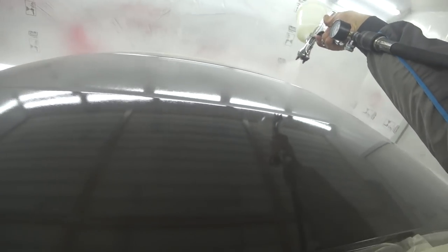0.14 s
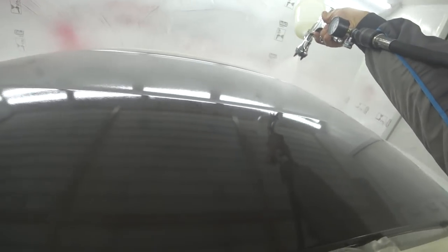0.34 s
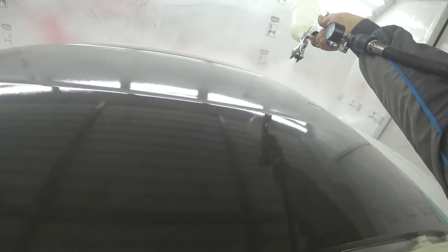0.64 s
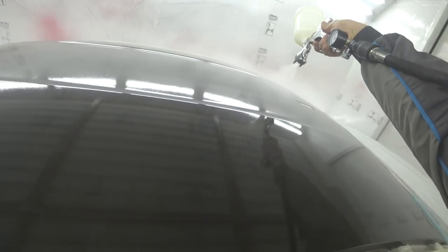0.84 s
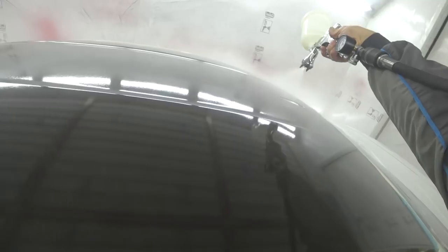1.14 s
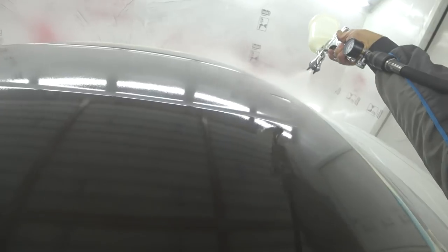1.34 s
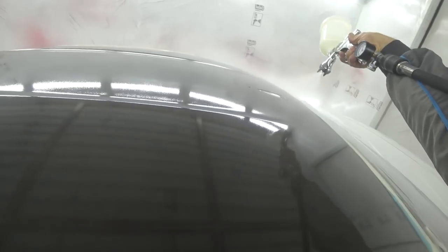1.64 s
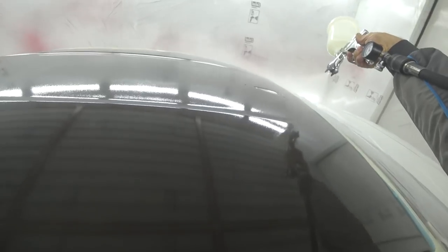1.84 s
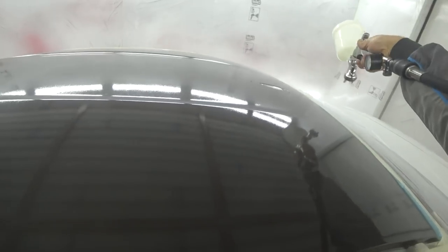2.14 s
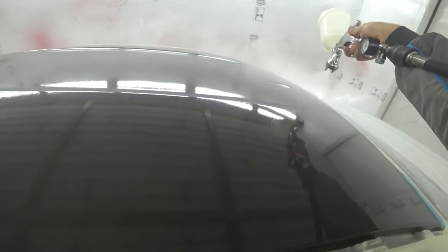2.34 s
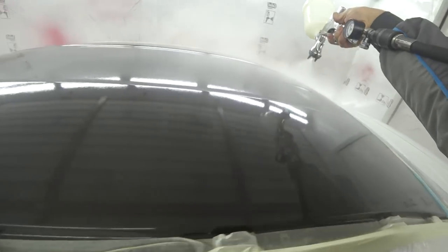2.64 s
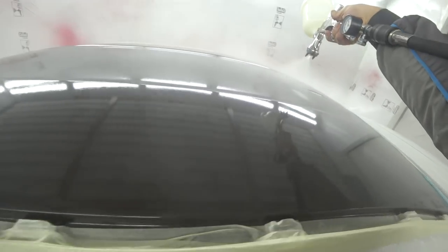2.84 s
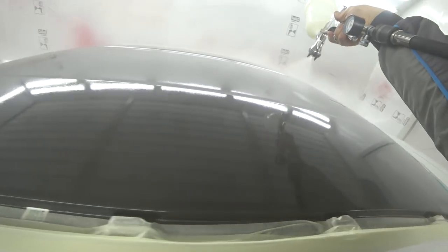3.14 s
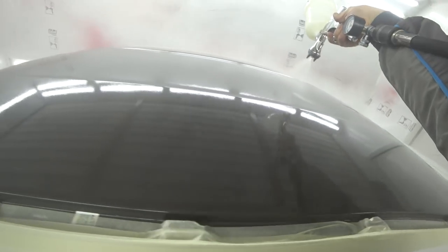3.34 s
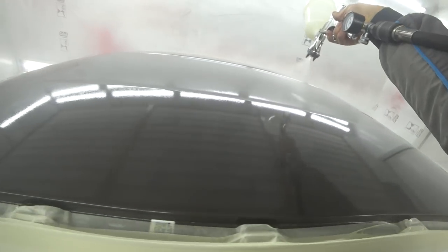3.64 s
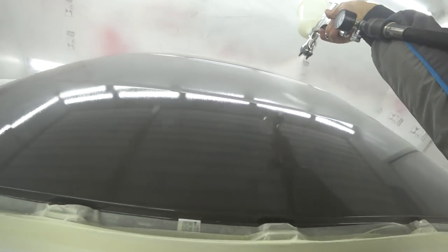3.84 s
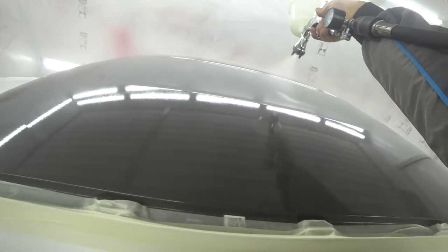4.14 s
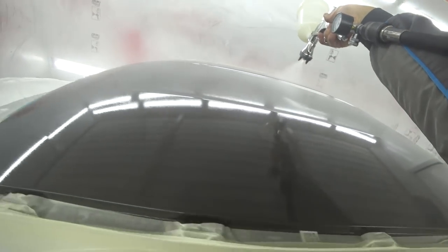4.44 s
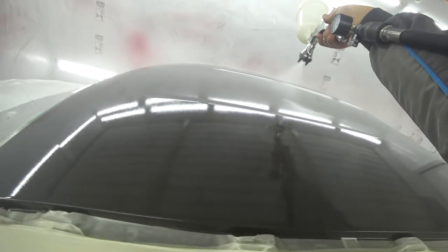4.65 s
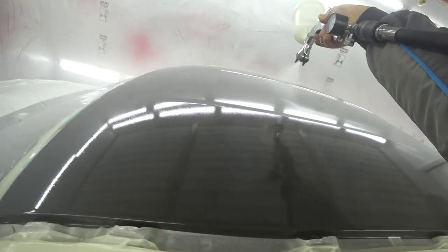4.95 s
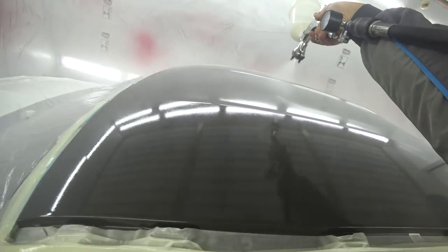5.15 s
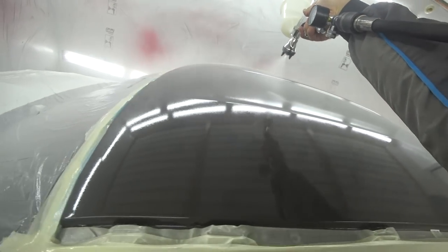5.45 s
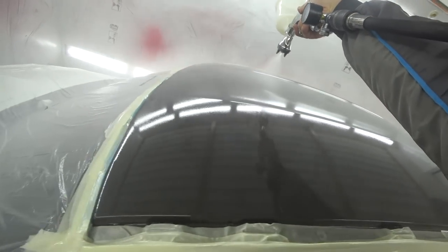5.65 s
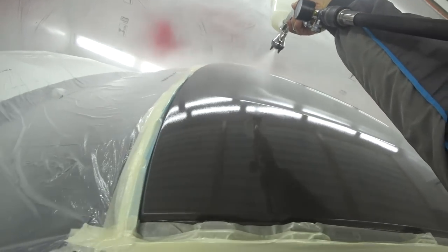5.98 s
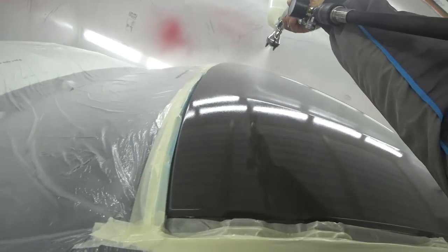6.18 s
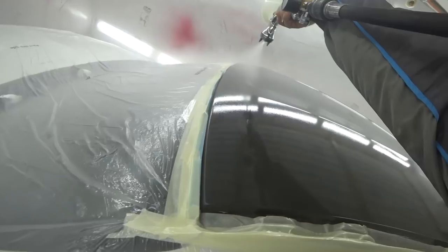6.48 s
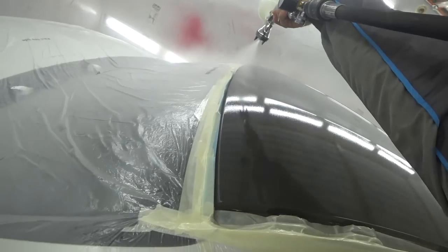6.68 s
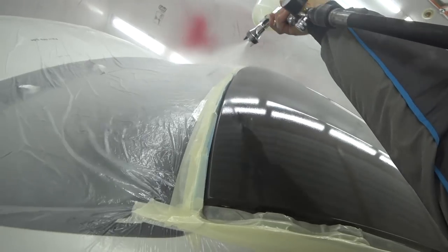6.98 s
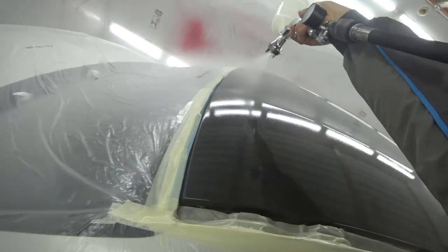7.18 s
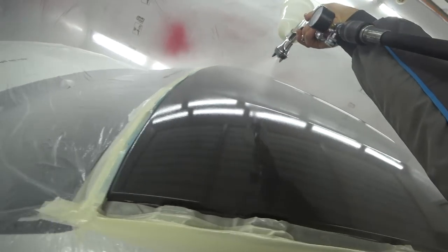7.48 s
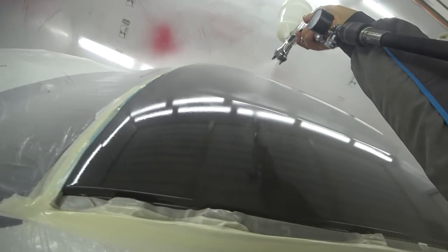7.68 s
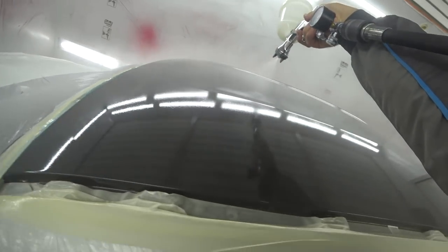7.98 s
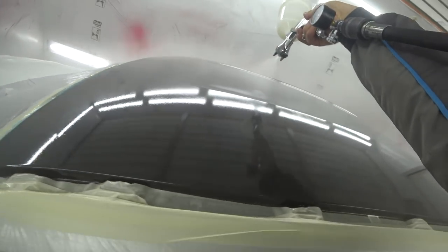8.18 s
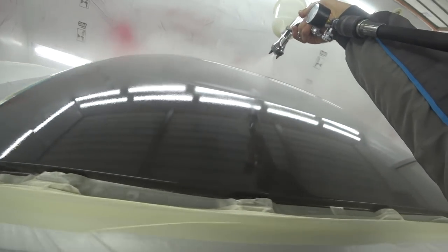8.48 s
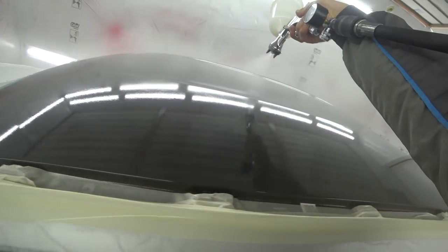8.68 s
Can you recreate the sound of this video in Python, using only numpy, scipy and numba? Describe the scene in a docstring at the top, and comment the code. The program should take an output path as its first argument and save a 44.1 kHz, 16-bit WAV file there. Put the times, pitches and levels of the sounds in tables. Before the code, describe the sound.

A spray gun is already hissing at 0 s and continues unbroken to the end, nearly 9 s, at almost constant level. The sound is bright, dense and airy, strongest in the high range with little body, finely fluttering like turbulent air. It is close to a small stereo microphone worn by the painter, with a diffuse hiss returning from the booth walls. Its colour stays fairly settled until about 1.5 s, then shifts smoothly between 2 and 3 s, again near 4 s and 4.5 to 5 s, as the gun sweeps across the panel. Around 6 to 7 s it grows very slightly stronger, with quick swishy changes near 7 s as the pass turns back; another gradual shift follows until about 8.2 s. Underneath throughout, two faint mid-low fan tones waver and swell unevenly over soft, gusty duct rush and deep rumble.

```python
"""A closed paint booth: a spray gun hisses at arm's length from a small camera on the painter's body.
The jet is coloured noise; it radiates unevenly and echoes off the panel, so its colour shifts with each pose.
The walls return a diffuse hiss. Two extractor fans sing sine blade tones over a noise rumble and rush in the
ducts. The camera's two ports give left and right their own level and phase."""
import sys
import numpy as np
from scipy import signal
from scipy.fft import rfft, irfft, next_fast_len
from scipy.io import wavfile
from scipy.ndimage import uniform_filter1d
from numba import njit

SR = 44100
rng = np.random.default_rng(int(sys.argv[2]) if len(sys.argv) > 2 else 0)


def store_wav(level_fs):
    """Save 16-bit WAV to argv[1]."""
    pcm = np.round(np.clip(np.atleast_2d(level_fs), -1, 1) * 32767)
    wavfile.write(sys.argv[1], SR, pcm.T.astype(np.int16))


N = 388962  # length in samples

# Colour of the jet in each pose of the painter. Each row: frequency in Hz, relative density in dB per Hz.
REACH_RIGHT = [(1300, -47), (2240, -15), (2930, -5), (3880, -8), (4390, -2), (5000, -8.5), (5340, -1.5),
               (5770, -4.5), (6980, -2.5), (7410, 0.5), (8100, 2), (12140, -9.5), (12920, -5.5),
               (15680, -9)]
TURN_RIGHT = [(1300, -52), (2240, -15), (3530, -1.5), (4050, -9.5), (4480, -6), (5860, -13), (6550, -1.5),
              (7150, -2.5), (9910, 2.5), (11280, -0.5), (12060, -7), (13350, -17), (14730, -20),
              (15680, -6)]
SET_OFF = [(1300, -45), (2240, -17.5), (2760, -9.5), (3790, -12), (4130, -6.0), (4650, -8.5), (7410, -0.5),
           (8610, -6.5), (9470, -1), (10850, -6), (12140, -16), (12830, -7.5), (13700, -5.5), (15680, -11)]
MID_PANEL = [(1300, -56), (2240, -15.5), (3360, -12.5), (5080, -4.5), (6200, -5.5), (6980, 1), (8530, -9.7),
             (9130, -4), (10680, -11), (12400, -6), (13440, -2), (14210, -7), (14900, -16), (15680, -11)]
LEAN_LEFT = [(1300, -40), (2240, -16), (3190, -11.5), (5000, -2.5), (7320, -0.5), (7750, -7), (8180, -3.5),
             (9730, -13.5), (10340, -4), (12230, -2), (12920, 1), (13780, -5.5), (14640, -15), (15680, -16)]
REACH_LEFT = [(1300, -41), (2240, -19.5), (2930, -19.5), (3960, -8), (5170, -7), (5600, -2.5), (6120, -6),
              (6630, -0.5), (9220, -15), (10340, -5.5), (12920, -8), (13950, -6.5), (14700, -13),
              (15680, -13)]
COME_BACK = [(1300, -52), (2240, -15.5), (3100, -14), (4220, -8), (4820, -15), (6200, -4), (7580, -1.5),
             (8010, 1), (8440, -1.5), (9470, -8), (10340, -13), (12230, -15), (13350, -8), (15680, -8.5)]
# How far off the camera's axis the gun is. One value for each pose: 0 ahead to 1 at the side.
OFF_AXIS = [0.93, .99, 1, 0.81, 0.35, 0.2, 0.36]
# The painter's sweep. Each row: time in seconds, pose 0-6 in the order above, level in dB.
SWEEP = [(0, .2, -43.5), (.6, .01, -43.5), (1.5, .1, -44.5), (1.95, .4, -45), (2.22, .93, -44),
         (2.45, 1.02, -44), (2.7, 1.42, -44), (3.1, 1.95, -44), (3.55, 2.02, -43.5), (3.97, 2.97, -43),
         (4.42, 3.05, -43), (4.85, 3.9, -43), (5.85, 4.05, -43), (6.2, 4.45, -42), (6.62, 4.62, -42.5),
         (6.86, 4.98, -42.5), (7.5, 5.03, -42), (8.18, 5.93, -42.5), (8.82, 6, -42.5)]
# Fringes of the echo off the panel, gliding as the gun moves.
# Each row: time in seconds, centre in Hz, peak or dip in dB.
HIGH_FRINGE = [(0, 14300, -5), (.4, 13700, -8), (.65, 13600, -2), (1.5, 14000, 4), (1.95, 13600, 4),
               (2.2, 14000, -1), (2.5, 13400, 5), (2.75, 13900, -8), (2.98, 14400, 0), (5, 12300, -3),
               (6.5, 12500, -2.5), (6.9, 13600, 2), (7.03, 13700, -7), (7.15, 13000, 1), (7.5, 13000, -2),
               (7.8, 13500, 2.5), (8.3, 14400, -3), (8.82, 14400, -2)]
MID_FRINGE = [(0, 10400, 3.5), (.4, 10300, 1.5), (1.9, 10300, -2.5), (2.15, 10400, -3), (2.3, 7300, -9),
              (2.7, 7000, -6), (2.9, 7160, -0.7), (5.6, 8600, -1.5), (6, 8700, -2), (6.85, 10200, -3),
              (6.97, 10000, 6), (7.04, 8000, -6), (7.15, 8300, 2), (7.32, 8100, -7), (7.4, 9800, 4),
              (7.55, 9700, -8), (8.2, 10300, 5), (8.82, 10300, 8.5)]
# Widths of the high and the mid fringe, in Hz.
FRINGE_WIDTH_HZ = 2300, 1000
# Low skirt of the jet. Each row: frequency in Hz, relative density in dB per Hz.
SKIRT = [(400, -47), (680, -16), (900, -5.5), (1350, 1), (1900, -4), (2200, -10.5), (2500, -20),
         (3000, -43)]
# Resonances and dips of the camera housing. Each row: centre in Hz, width in Hz, gain in dB.
HOUSING = [(2640, 380, 5), (3080, 520, -4), (3646, 150, -1.5), (4780, 200, 4), (5210, 440, -3.5),
           (5850, 500, 4), (6420, 640, -3), (9180, 380, -2.5), (10060, 450, 1), (11200, 450, 2),
           (11880, 710, -2.5)]
# The camera's two ports. Each row: frequency in Hz, left minus right in dB, lead of left in rad,
# further difference off axis in dB, further lead off axis in rad.
PORTS = [(30, 0, -0.049, 0, 0), (120, -2.5, -0.51, -4, 0), (403, -7.5, -0.53, -2, 0),
         (800, -9.5, -.2, 0, 0), (1050, -5.5, 0.3, 0, 0), (1840, -1, 0.071, -0.5, 0.096),
         (4060, .5, 0.25, 1, -0.1), (6400, 3, 0.29, -1, -0.68), (7400, 4.5, -0.029, -1, -0.97),
         (8200, 9, -0.13, -10, -0.86), (9000, -4, -.1, 6, -0.72), (10000, 2.5, -0.26, -3, -0.62),
         (11400, 2.5, -0.43, -0.5, -.7), (12300, -1.5, -0.11, -2, -0.9), (13900, 1, 0, -2.5, -0.92),
         (15500, 0, 0.21, -3, -.6)]
# Hiss returned by the booth walls. Each row: frequency in Hz, relative density in dB per Hz.
WALLS = [(1000, -40), (2500, -19), (4000, -15), (5500, -9), (7000, -2), (9000, 0), (12000, -2), (15500, -7)]
# Blade tones of the two fans and their sum tone; standing waves make them swell as the painter moves.
# Each row: time in seconds, first fan in dB, second fan in dB, sum tone in dB.
FANS = [(0, -73, -68, -86), (.25, -63, -60.5, -83), (.6, -68, -61, -84), (.85, -73, -60, -74.5),
        (1.45, -74, -62.5, -77.5), (1.8, -74, -65.5, -83), (2.0, -80, -69, -87), (2.2, -70, -65, -83),
        (2.45, -69, -64, -76.5), (3.1, -79, -61.5, -76.5), (3.45, -72, -64, -89), (4.2, -73, -67.5, -91),
        (4.8, -65.5, -60.5, -93), (5.3, -64.5, -65, -85), (5.55, -63.5, -61, -76.5),
        (6.0, -60.5, -65.5, -79), (6.2, -63.5, -74, -80), (7.4, -65.5, -73, -80), (7.65, -63.5, -64, -78),
        (8.2, -62, -63, -87), (8.82, -66, -62.5, -93)]
# Blade tone of each fan, in Hz.
FAN_HZ = (385.3, 455.5)
# Air in the ducts: deep rumble, and the rush around the blade tones.
# Each row: frequency in Hz, relative density in dB per Hz.
RUMBLE = [(15, -30), (25, -8.5), (60, -4), (100, 1.5), (150, -2.5), (220, -13), (300, -21), (500, -50)]
RUSH = [(120, -29), (230, -7.5), (330, -3), (400, 1), (490, -1), (550, -7.5), (680, -20.5), (900, -28)]
# Level of the duct air. Each row: time in seconds, rumble in dB, rush in dB.
DUCTS = [(0, -67.5, -62), (1.3, -68.5, -63), (1.9, -66.5, -63), (2.25, -67, -59), (2.65, -68, -63),
         (5, -68, -62.5), (8.82, -70.5, -64.5)]
# Resonances of the booth. Each row: centre in Hz, width in Hz, gain in dB.
BOOTH = [(94, 7.8, 1), (122, 9, 2), (189, 21, 8.5), (244, 13, 3.5), (376, 27, 3), (515, 10, 3)]

SKIRT_DB, WALLS_DB = -65.5, -54.5
STRAY_DB = -19.5  # what is heard of every other pose's colour, by way of the panel
FLICKER_SETTLES_S = .06  # the flicker evens out over this time
FAN_WAVER_DB, WAVERS_PER_S = 1.6, 13
GUST_DB, GUSTS_PER_S = 0.9, 4.5
DUCT_OPPOSED = 0.17  # scales the duct air in opposite phase, before each port's own factor
TOP_HZ = 15750  # where the recorder cuts
SIZE = next_fast_len(N, True)  # working length in samples
HZ = np.fft.rfftfreq(SIZE, 1 / SR)
LOG_HZ = np.log(HZ + 1)  # the 1 avoids log(0)


def jet():
    """Turbulent air and paint: noise whose colour follows the gun from pose to pose, fluttering at the ports."""
    ahead, aside = spray()
    for table, width_hz in zip((HIGH_FRINGE, MID_FRINGE), FRINGE_WIDTH_HZ):
        hz, db = along_time(table)
        ahead = bell(ahead, hz, float(width_hz), undb(db))
        aside = bell(aside, hz, float(width_hz), undb(db))
    return flutter(ports(ahead, 0) + ports(aside, 0.92))


def spray():
    """The uneven radiation of the jet, each pose's hiss shared between ahead of the camera and its side."""
    colours = REACH_RIGHT, TURN_RIGHT, SET_OFF, MID_PANEL, LEAN_LEFT, REACH_LEFT, COME_BACK
    pose, jet_db = along_time(SWEEP)
    pose = np.clip(pose, 0, 6)
    housing_db = ripple(HOUSING)
    ahead = undb(SKIRT_DB) * irfft(noise(SKIRT), SIZE)
    aside = 0
    for k, (colour, off_axis) in enumerate(zip(colours, OFF_AXIS)):
        # poses fade in power, so the hiss never sags between two of them
        nearness = np.clip(1 - np.abs(pose - k), 0, 1)
        power = undb(jet_db) ** 2 * (nearness + undb(STRAY_DB) ** 2)
        hiss = np.sqrt(power) * irfft(noise(colour, housing_db), SIZE)
        ahead = ahead + (1 - off_axis) * hiss
        aside = aside + off_axis * hiss
    return ahead, aside


def flutter(spectrum):
    """Turbulence: four bands of the jet flicker each alone, and the whole jet flutters fast."""
    edges_hz = [0, 3500, 6400, 11800, SR]
    flickering = 0
    for low, high in zip(edges_hz, edges_hz[1:]):
        band = irfft(spectrum * ((HZ >= low) & (HZ < high)), SIZE)
        flickering = flickering + undb(.8 * quick(walk(45))) * band
    return flickering * undb(0.22 * walk(110))


def walls():
    """Smooth diffuse return of the hiss and its low skirt off the booth walls, unrelated at the two ports."""
    skirt_db = SKIRT_DB - 11
    returns = [undb(WALLS_DB) * noise(WALLS) + undb(skirt_db) * noise(SKIRT) for _ in range(2)]
    return irfft(returns, SIZE)


def fans():
    """Two blade tones with a slight wander in pitch; the weak third tone sits at their sum."""
    phases = []
    for blade_hz in FAN_HZ:
        hz = blade_hz + 0.26 * walk(2.91)
        phases.append(np.cumsum(2 * np.pi * hz / SR) + 2 * np.pi * rng.random())
    phases.append(sum(phases))
    tones = 0
    for phase, db in zip(phases, along_time(FANS)):
        gain = undb(db + FAN_WAVER_DB * walk(WAVERS_PER_S))
        tones = tones + np.sqrt(2) * gain * np.sin(phase)  # a sine of rms 1, times its gain
    return tones


def ducts():
    """Gusty rumble and rush that ring the booth, and a small unringing part in opposite phase at the ports."""
    ringing, opposed, booth_db = 0, 0, ripple(BOOTH)
    for colour, db in zip((RUMBLE, RUSH), along_time(DUCTS)):
        gain = undb(db + GUST_DB * walk(GUSTS_PER_S))
        ringing = ringing + gain * irfft(noise(colour, booth_db), SIZE)
        opposed = opposed + DUCT_OPPOSED * gain * irfft(noise(colour), SIZE)
    return ringing, opposed * np.array([[.5], [-1]])  # weaker at the left, inverted at the right


def ports(x, off_axis):
    """Spectra of one arriving sound at the camera's two ports: each gets its own level and phase."""
    db, rad, more_db, more_rad = along_hz(PORTS)
    level = undb((db + off_axis * more_db) / 2)
    tilt = level * np.exp(.5j * (rad + off_axis * more_rad))
    pair = np.array([tilt, 1 / tilt])
    # the mean of the two ports keeps the level of the sound
    return rfft(x) * 2 * pair / np.abs(pair.sum(axis=0))


@njit
def bell(x, hz, width_hz, gain):
    """State-variable band-pass added back to the sound: a peak or dip whose centre may glide."""
    y, band, low = np.empty(len(x)), 0., 0.
    for i in range(len(x)):
        g = np.tan(np.pi * hz[i] / SR)
        damping = width_hz / hz[i]
        v = (band + g * (x[i] - low)) / (1 + g * (g + damping))
        band = 2 * v - band
        low = low + 2 * g * v
        y[i] = x[i] + (gain[i] - 1) * damping * v
    return y


def ripple(modes):
    """Gain in dB that a set of resonances adds at every frequency."""
    return sum(db / (1 + (2 * (HZ - hz) / width) ** 2) for hz, width, db in modes)


def noise(colour, ripple_db=0):
    """Spectrum of a random noise of rms 1 with this colour."""
    real, imaginary = rng.standard_normal((2, len(HZ)))
    spectrum = undb(along_hz(colour)[0] + ripple_db) * (real + 1j * imaginary)
    return spectrum * SIZE / np.sqrt(2 * np.sum(np.abs(spectrum) ** 2))


def walk(rate):
    """Random levels drawn rate times a second, joined by straight lines; spread near 1."""
    levels = rng.standard_normal(int(SIZE / SR * rate) + 2)
    return 1.2 * np.interp(np.arange(SIZE) * rate / SR, np.arange(len(levels)), levels)


def quick(level):
    """Only the fast part of a walk: its running mean is taken away."""
    return level - uniform_filter1d(level, int(FLICKER_SETTLES_S * SR))


def undb(db):
    """Amplitude factor of a level in dB."""
    return np.exp(np.asarray(db) * np.log(10) / 20)


def along_hz(table):
    """Columns of a table by Hz, drawn out over log frequency."""
    hz, *columns = np.transpose(table)
    return [np.interp(LOG_HZ, np.log(hz), column) for column in columns]


def along_time(table):
    """Columns of a table by seconds, drawn out to every sample."""
    seconds, *columns = np.transpose(table)
    return [np.interp(np.arange(SIZE) / SR, seconds, column) for column in columns]


def scene():
    """Jet, wall return, fans and duct air together at the two ports."""
    ringing, opposed = ducts()
    extraction = irfft(ports(ringing + fans(), 0), SIZE)
    return (jet() + walls() + extraction + opposed)[:, :N]


def record(dry):
    """The recorder cuts the top steeply with an elliptic low-pass."""
    low_pass = signal.ellip(16, .2, 80, TOP_HZ, fs=SR, output="sos")
    return signal.sosfilt(low_pass, dry)


dry = scene()
out = record(dry)
store_wav(out)
```